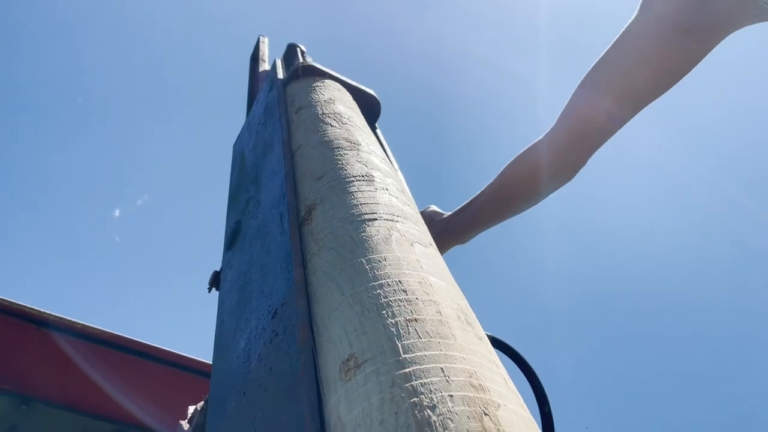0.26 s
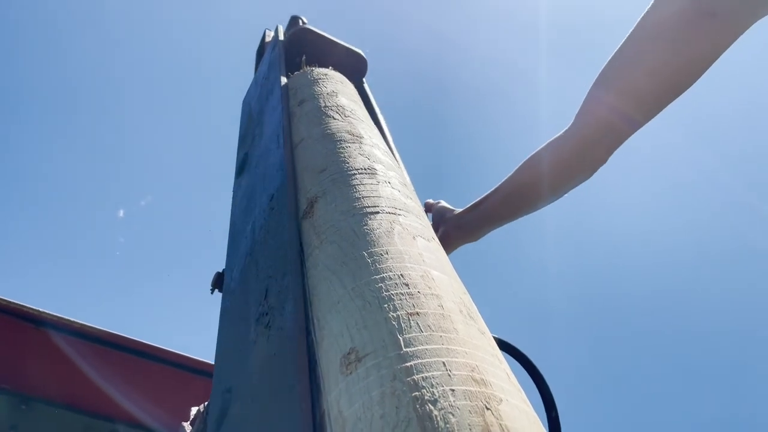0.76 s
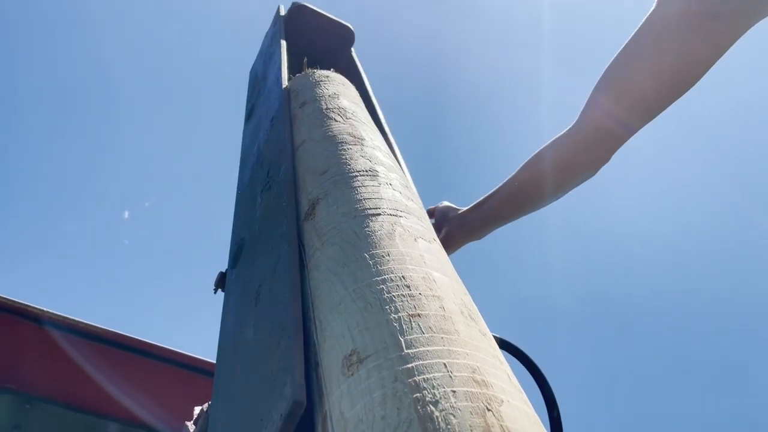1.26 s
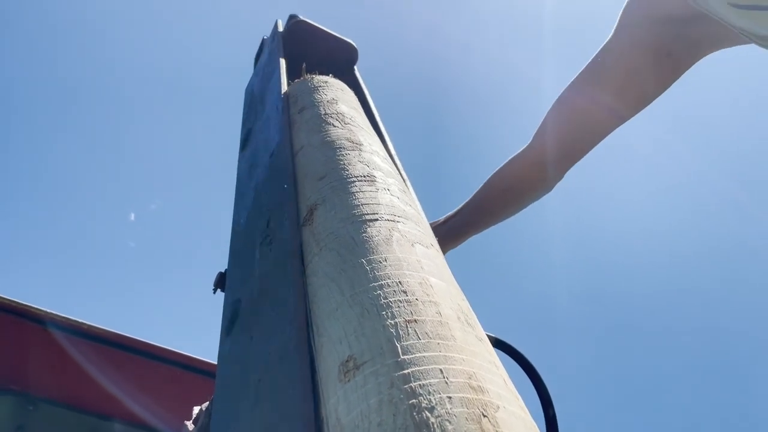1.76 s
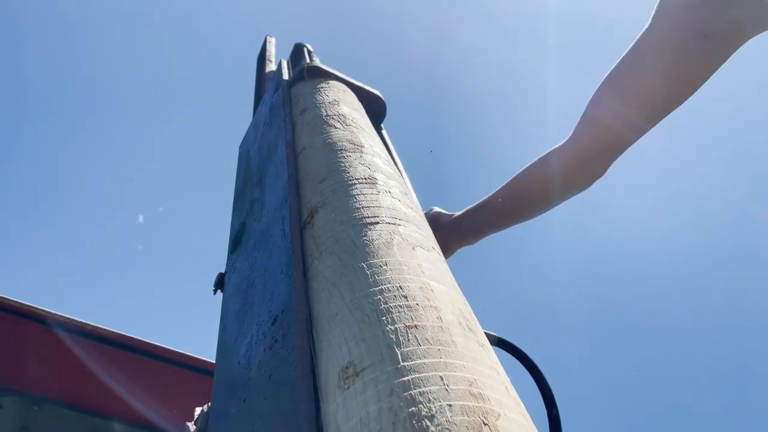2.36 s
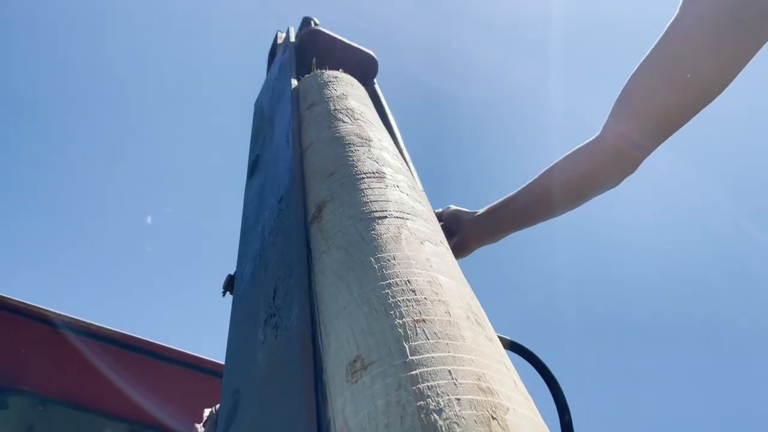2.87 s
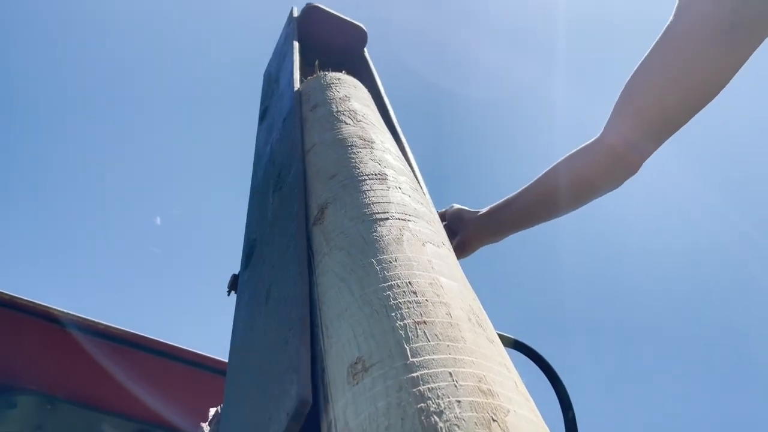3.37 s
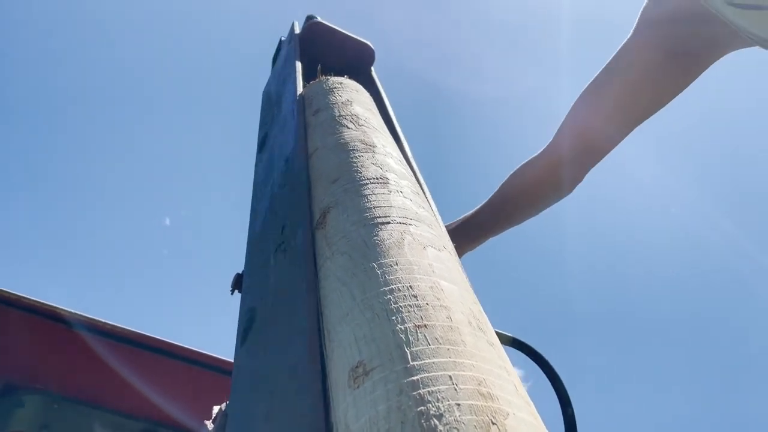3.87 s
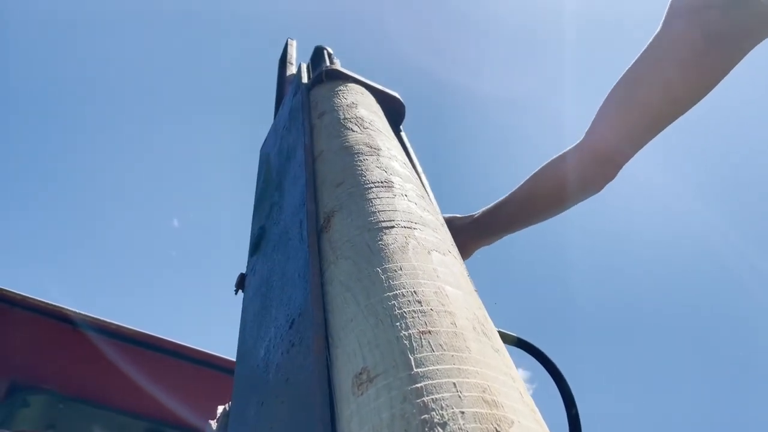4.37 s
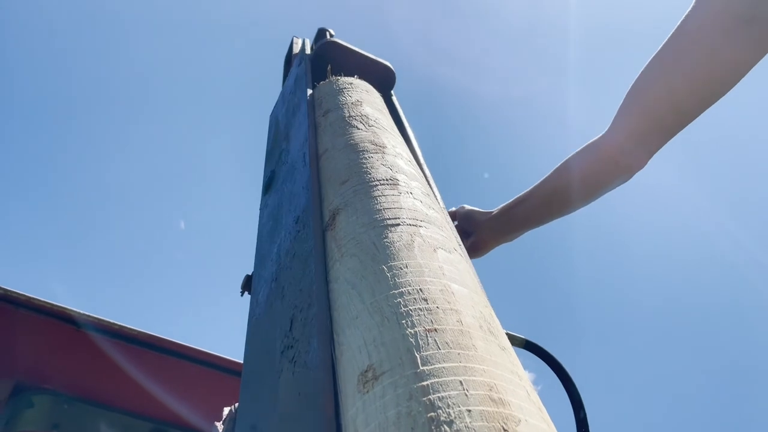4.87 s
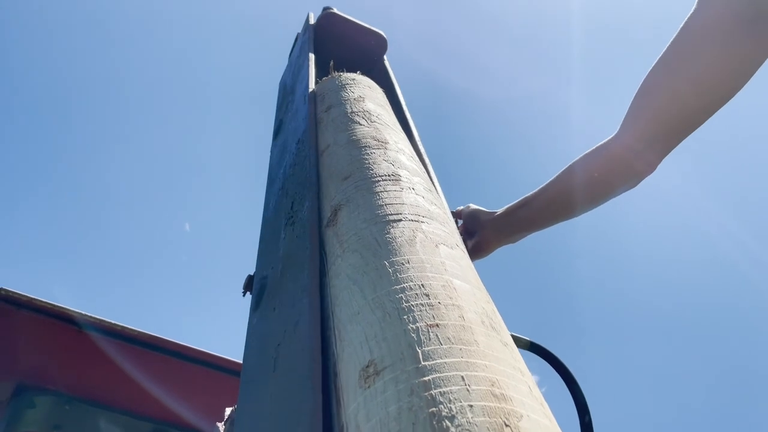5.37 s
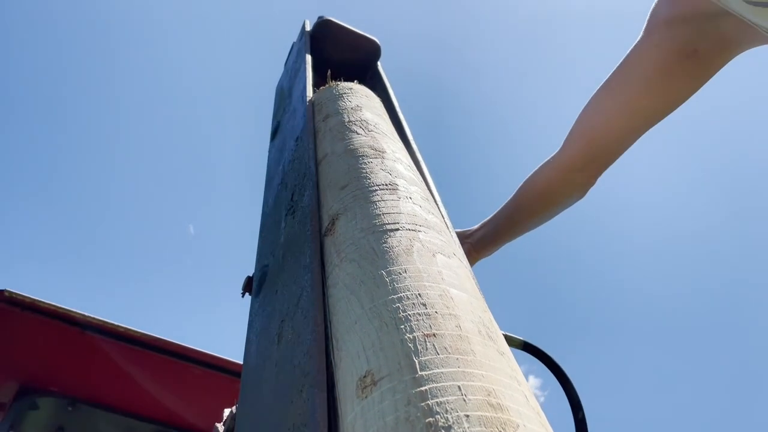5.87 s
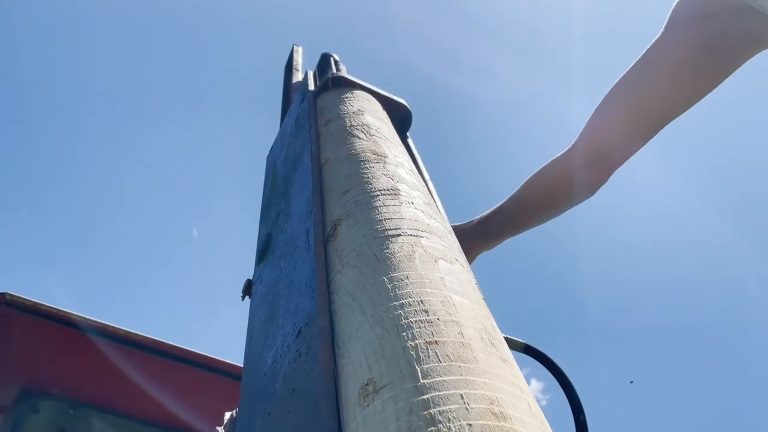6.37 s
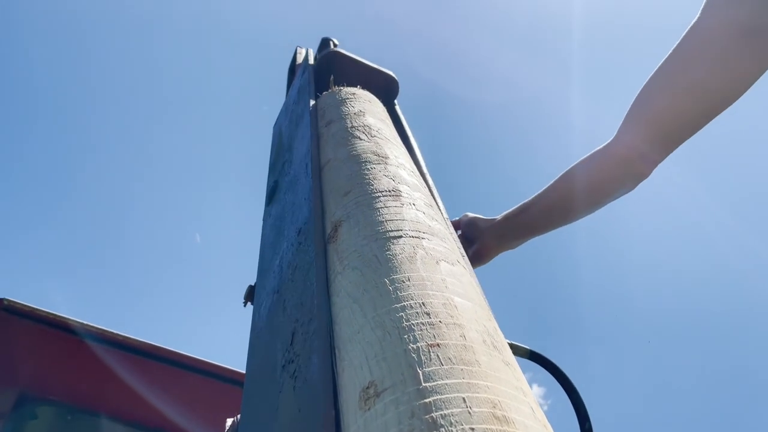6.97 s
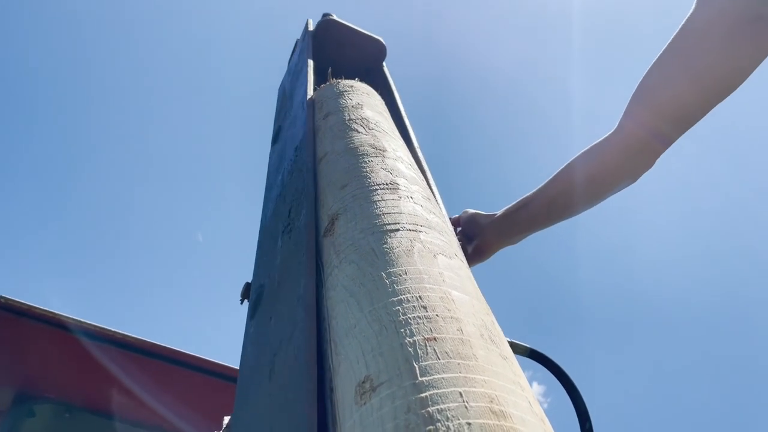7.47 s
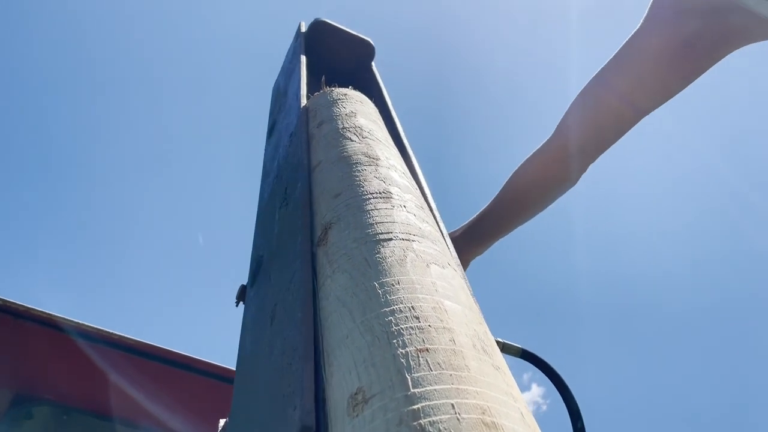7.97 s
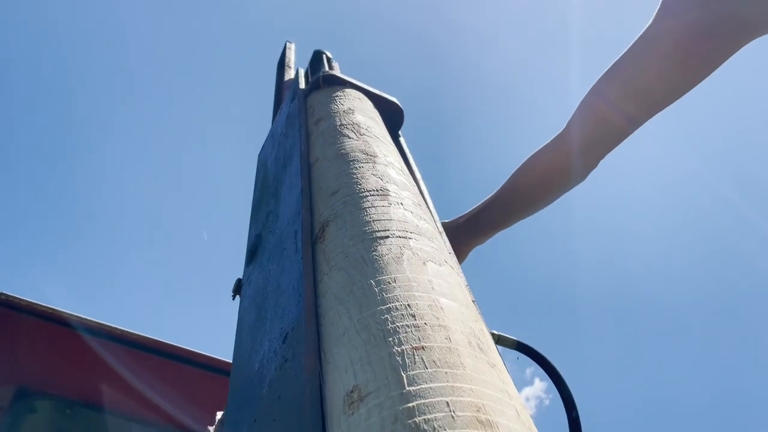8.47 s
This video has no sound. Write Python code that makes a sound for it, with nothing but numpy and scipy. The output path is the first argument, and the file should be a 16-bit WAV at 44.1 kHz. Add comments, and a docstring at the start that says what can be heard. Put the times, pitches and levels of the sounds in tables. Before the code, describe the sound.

A hydraulic post driver on a tractor slams a wooden post about every two seconds, with clanking, scraping steel over a steadily chugging diesel engine.

```python
"""Hydraulic post driver on a tractor

A phone lies at the foot of the post. A steel ram slams down: a falling sweep, a thump, a crack and a long ring.
Loose steel knocks, a plate slaps and a bar taps, each a burst of noise, decaying tones or both.
Shaped noise makes the ram scrape, parts rattle and oil hiss; a valve reversal clunks the frame.
The diesel, tones that follow the crank plus noise, droops as oil lifts the ram.
The phone's gain control ducks after every blow."""
import sys
import numpy as np
from scipy import signal
from scipy.fft import rfft, irfft, next_fast_len
from scipy.io import wavfile
from scipy.ndimage import uniform_filter1d, minimum_filter1d

SR = 44100
rng = np.random.default_rng(int(sys.argv[2]) if len(sys.argv) > 2 else 0)


def dump_mix(stems):
    """Bounce the given channels to the path in sys.argv[1] as a 16-bit WAV at rate SR."""
    frames = np.atleast_2d(stems).T  # one column per channel
    limited = np.clip(frames, -1, 1)  # hard clip at full scale
    pcm = np.round(limited * 32767).astype(np.int16)
    wavfile.write(sys.argv[1], SR, pcm)


N = 384111
LEAD_IN = SR // 4  # samples made before the start and cut off at the end
LONG = N + LEAD_IN
TIME = (np.arange(LONG) - LEAD_IN) / SR
PATHS = 3  # a direct path, then scatter near the left and near the right port

# the ram lands on the post; the first blow falls just before the start:
# t/s, thud level/dB, ring level/dB, loose plate level/dB, bar level/dB,
# then what is added to the usual scraping/dB, rattling/dB and oil hiss/dB
BLOWS = [(-.13, -3, -17, -32, -38, 1.5, 1.5, -0.5), (1.955, -3.0, -16.5, -28.5, -24, 1, 1, -2.3),
         (4.049, -4, -19.5, -34, -29, 2, 0, -1), (6.119, -3.5, -16.5, -32, -31, 1.3, 1, -1),
         (8.277, -4.5, -18, -34, -29, 0, -3, -4)]
# the valve reverses and the frame clunks: t/s, thud level/dB, ring level/dB
CLUNKS = [(0.262, -15, -17), (2.347, -17, -18), (4.481, -10.5, -17), (6.576, -13.5, -17.5),
          (8.688, -14, -19.5)]
# each lift: ram starts to rise t/s, pump lets go at the top t/s, added to the usual oil hiss/dB
LIFTS = [(.6, 1.367, .5), (2.667, 3.521, 1.5), (4.835, 5.601, -1.5), (6.915, 7.716, -1.5)]
# tones of ram, frame and post: f/Hz, level/dB, basic time to fade by 60 dB/s (ring() adapts it)
STEEL = [(288.3, -5.5, 0.26), (382.8, -2.5, 0.34), (468.6, -2.5, 0.89), (496, -3, 0.26), (528.3, 5.5, 0.29),
         (543, 2, 0.33), (602, 2.5, 0.2), (747.6, 0.5, 0.39), (830, -9.5, 0.36), (922, -6.5, 0.6),
         (960, -9.5, 0.86), (1045, -8, 0.5), (1192, -14.5, 0.49), (1272, -13, 0.51), (1364, -10, 0.83),
         (1438, -8, 0.64), (1584, -13, 0.54), (1750, -8, 0.71), (1803, -5.5, 0.35), (2060, -7, 0.37),
         (2530, -5, 0.32), (2972, -11, 0.67), (3710, -9, 0.463), (4000, -18, 0.32), (4400, -23, 0.31),
         (4860, -13, 0.39)]


def undb(db):
    """Turns decibels into a plain multiplier."""
    return 10 ** (np.asarray(db) / 20)


def level(x, db):
    """Sets the average strength (rms) of x to db."""
    return x * undb(db) / np.sqrt(np.mean(x ** 2))


def noise():
    """Plain white noise, different on each path."""
    return rng.standard_normal((PATHS, LONG))


def on_log(table, hz):
    """Reads (Hz, value) points along a logarithmic axis."""
    f, v = np.transpose(table)
    return np.interp(np.log(np.maximum(hz, 1)), np.log(np.maximum(f, 1)), v)


def colour(x, table):
    """Filters x by the curve of (Hz, dB) points and sets its rms to 1."""
    size = next_fast_len(LONG)
    gain = undb(on_log(table, np.fft.rfftfreq(size, 1 / SR)))
    return level(irfft(rfft(x, size) * gain, size)[:, :LONG], 0)


def band(x, hz, width_hz):
    """A resonance: lets through a band around hz."""
    return signal.lfilter(*signal.iirpeak(hz, hz / width_hz, SR), x)


def walk(rate):
    """A smooth random wander: values held 1 / rate s, then smoothed twice; its spread is about 0.74."""
    k = int(SR / rate)
    held = np.repeat(rng.standard_normal(LONG // k + 1), k)
    return uniform_filter1d(uniform_filter1d(held, k), k)[:LONG]


def grit(share, spread_db):
    """Noise in which a share of the samples are clicks of very uneven size."""
    size_db = np.minimum(spread_db * rng.exponential(size=LONG), 4 * spread_db)
    clicks = (rng.random(LONG) < share) * undb(size_db)
    return noise() * (1 + clicks)


def burst(rise_s, fall_s):
    """A short shower of contacts: noise that swells and dies away."""
    t = np.arange(int(.2 * SR)) / SR
    return (1 - np.exp(-t / rise_s)) * np.exp(-t / fall_s) * rng.standard_normal((PATHS, len(t)))


def ring(modes, bright_db, shorten, rise_s, scatter_db, chatter_db=3.5):
    """An object's modes, struck at a different spot each time and heard differently on each path."""
    t = np.arange(int(min(.4, shorten) * SR)) / SR
    hz, db, t60 = np.transpose(modes)
    # bright_db is in dB per octave
    gain = undb(db + bright_db * np.log2(hz / 500) + scatter_db * rng.standard_normal(len(hz)))
    gain = gain * np.exp(2j * np.pi * rng.random((PATHS, len(hz))))
    treble_damping = 0.27  # ring time shrinks as frequency to this power
    fade_s = shorten * t60 * (500 / hz) ** treble_damping
    detuned_hz = hz * (1 + 0.00347 * rng.standard_normal(len(hz)))
    pole = 2j * np.pi * detuned_hz - np.log(1000) / fade_s
    # loose joints chatter, so every mode flickers as it fades
    chatter = SR // 110  # samples between changes of contact
    steps = rng.standard_normal((len(hz), len(t) // chatter + 1))
    held = np.repeat(undb(chatter_db * steps), chatter, axis=1)
    flicker = uniform_filter1d(held, size=chatter)[:, :len(t)]
    tones = gain @ (flicker * np.exp(np.outer(pole, t)))
    return tones.imag * (1 - np.exp(-t / rise_s))


def add(out, s, x):
    """Mixes x into out, starting at s seconds."""
    i = int(s * SR) + LEAD_IN
    out[:, i:i + x.shape[-1]] += x[..., :LONG - i]


def blows():
    """A bending wave arrives treble first and sweeps down, the ground thumps, the steel cracks and rings on."""
    # sweep start Hz, thud length s, brightness dB per octave of the ring, share of free ring time, ring rise s
    blow_tone, clunk_tone = (1750, .0105, 0, 1, .01), (1050, .01, -2.6, 0.24, .007)
    out, t = np.zeros((PATHS, LONG)), np.arange(int(.2 * SR)) / SR
    thump = np.sin(2 * np.pi * 230 * t) * (t / .005) * np.exp(-t / .005)
    thump = thump + .4 * np.sin(2 * np.pi * 100 * t) * (t / .007) * np.exp(-t / .007)
    snap = np.sin(2 * np.pi * 2750 * t) * (t / .0007) * np.exp(-t / .0007)
    hits = [(*row[:3], *blow_tone) for row in BLOWS] + [(*row, *clunk_tone) for row in CLUNKS]
    for s, thud_db, ring_db, start_hz, thud_s, bright_db, shorten, rise_s in hits:
        sweep_hz = 410 + (start_hz - 410) * np.exp(-t / .0008)
        thud_shape = (1 - np.exp(-t * start_hz / .6)) * np.exp(-(t / thud_s) ** 5)
        thud = np.sin(2 * np.pi * np.cumsum(sweep_hz) / SR) * thud_shape
        crack = snap + 1.1 * band(band(burst(.0003, .0025), 2600, 3600), 2600, 3600)
        shudder = band(burst(.004, .035), 1100, 2000)
        sizzle = band(band(burst(.002, 0.036), 3800, 3200), 3800, 3200)
        add(out, s + .001, undb(thud_db) * thud)
        add(out, s, undb(thud_db - 0.3 + 6.5 * bright_db) * thump)
        add(out, s, undb(thud_db - 4 + 8 * bright_db) * crack)
        add(out, s, undb(thud_db - 19.0 + 0.3 * bright_db) * shudder)
        add(out, s, undb(thud_db - 31 + 5 * bright_db) * sizzle)
        add(out, s, undb(ring_db) * ring(STEEL, bright_db, shorten, rise_s, 2.0))
    # the post swells once more after each blow's thud
    rebound_hz, delay_s, swell_s, below_thud_db = 522, .011, .017, -14
    swell = np.sin(2 * np.pi * rebound_hz * t) * (t / swell_s) * np.exp(1 - t / swell_s)
    for s, thud_db, *_ in BLOWS:
        add(out, s + delay_s, undb(thud_db + below_thud_db) * swell)
    return out


def knocks():
    """Short clanks scuff and ring; after each blow a loose plate slaps back and sings, then a bar taps."""
    # loose steel that knocks around every blow: t from the blow/s, level/dB, brightness (0 = neutral)
    shake_pattern = [(-.268, -25.5, 2), (-.21, -32, -5), (.084, -11, -2), (0.101, -21, 9), (.204, -36, 0),
                     (.237, -31, 9.5), (0.364, -43, 15)]
    # other knocks on the frame: t/s, level/dB, brightness (0 = neutral)
    frame_knocks = [(0.607, -22.5, 1), (1.196, -22, -2), (1.24, -33, -6), (2.325, -40, 2),
                    (2.675, -21.5, 2), (3.785, -30, 0), (3.911, -30, 5), (4.414, -36, 1),
                    (4.724, -18, -2.5), (4.758, -13.5, -1), (4.776, -16, 1), (4.796, -18, 4),
                    (5.426, -22.5, 1.5), (5.689, -42.5, 12.5), (6.026, -28, 13), (6.09, -12, 3.5),
                    (6.224, -9, -1), (6.294, -40, 9), (6.489, -38, 14), (6.811, -19, 2), (7.501, -24, -4),
                    (7.571, -22.5, 5), (8.117, -18, -2), (8.196, -14.5, 1), (8.428, -27.5, 13.5),
                    (8.641, -27.5, 14)]
    # tones of the loose plate: f/Hz, level/dB, basic time to fade by 60 dB/s
    plate_modes = [(2510, -6, 0.3), (2750, -4, 0.3), (2950, 1.5, 0.425), (3780, 1, 0.26), (4150, -6.5, 0.3),
                   (4380, 2.5, 0.58), (4410, 1, 0.54), (4500, 3, 0.325), (4680, -4, 0.3), (5050, -5, 0.25),
                   (5240, -5, .2)]
    # tones of a bar that taps once as the ram settles: f/Hz, level/dB, basic time to fade by 60 dB/s
    bar_modes = [(917, 5, .2), (904, -5, .15), (965, -3, 0.15), (1519, -5, .15)]
    slap_delay_s, bar_delay_s = .066, .205
    out = np.zeros((PATHS, LONG))
    shakes = [(blow + s, db, bright_db) for blow, *_ in BLOWS for s, db, bright_db in shake_pattern
              if blow + s > 0]
    for s, db, bright_db in [*shakes, *frame_knocks]:
        scuff = band(band(burst(0.0031, 0.011), 2600, 2800), 2600, 2800)
        bright_scuff = band(band(burst(.001, 0.0082), 10300, 5000), 10300, 5000)
        add(out, s, undb(db - 9) * ring(STEEL, bright_db / 2, .2, .006, 3.5))
        add(out, s, undb(db - 14.5 + 2 * bright_db) * scuff)
        add(out, s, undb(db - 33.5 + 3.03 * bright_db) * bright_scuff)
    for s, _, _, plate_db, bar_db, *_ in BLOWS:
        slap = band(band(burst(0.002, 0.031), 4000, 2800), 4000, 2800)
        add(out, s + slap_delay_s, undb(plate_db) * ring(plate_modes, 2, 0.8, 0.006, 1.5))
        add(out, s + slap_delay_s, undb(plate_db + 12.5) * slap)
        add(out, s + bar_delay_s, undb(bar_db) * ring(bar_modes, 0, 0.6, 0.004, 2.7))
    return out


def strokes():
    """Scraping, rattling and oil levels: each fall, rise and arrival plays its shape at its own time and strength."""
    # every fall and its aftermath: t from the blow/s, scraping/dB, rattling/dB, oil hiss/dB
    fall_shape = [(-.32, -46, -54, -65), (-.285, -41, -60, -66), (-.255, -30.5, -56.5, -59),
                  (-.2, -29, -39, -42), (-.12, -27.5, -43, -45.5), (-.075, -28, -35, -39),
                  (-.03, -22.5, -45.5, -46), (-.005, -24.5, -35, -47), (.005, -20.5, -26.5, -37),
                  (.045, -23.5, -23.5, -34), (.1, -27, -35, -41), (.15, -35, -37, -49),
                  (.175, -32.5, -46, -32), (.21, -38.5, -41, -50), (.25, -44, -44.5, -41.5),
                  (.33, -45, -51, -55.5), (.37, -45.5, -45.5, -44), (.41, -42, -50.5, -51),
                  (.52, -42.5, -52.5, -60)]
    # every lift: t from its start/s, scraping/dB, rattling/dB, oil hiss/dB
    rise_shape = [(-.05, -38.5, -55, -63), (.03, -34.5, -44.5, -47), (.12, -40, -43.5, -48.5),
                  (.2, -37, -43, -48.5), (.4, -38.5, -47, -54.5)]
    # every arrival at the top: t from the pump letting go/s, scraping/dB, rattling/dB, oil hiss/dB
    top_shape = [(-.27, -42, -50.5, -59), (-.13, -36.5, -48, -55), (.05, -50.5, -49, -59.5),
                 (.17, -47.5, -55, -65.5)]
    # the falling ram first scrapes bright, then lower rails join in:
    # t from the blow/s, one blow's share of the tilt/dB per octave
    fall_tilt = [(-.36, -1), (-.27, 10), (-.17, 6), (-.04, -2), (.05, -0.5)]
    starts = [(fall_shape, row[0], row[5:]) for row in BLOWS]
    for rise, top, oil_db in LIFTS:
        starts += [(rise_shape, rise, (0, 0, oil_db)), (top_shape, top, (0, 0, oil_db))]
    rows = [(at + s, *np.add(shape_db, more_db)) for shape, at, more_db in starts for s, *shape_db in shape]
    s, *columns = np.transpose(sorted(rows))
    # the shares of all blows add up; each keeps its end values outside its own points
    tilt = sum(np.interp(TIME - blow, *np.transpose(fall_tilt)) for blow, *_ in BLOWS)
    return *(np.interp(TIME, s, c) for c in columns), tilt


def ram():
    """Steel grinds on steel and shakes the rails, loose parts rattle, oil hisses through the valve."""
    # rail resonances: f/Hz, width/Hz, relative level/dB
    rail_modes = [(501, 37, 9), (593, 77, 5), (840, 70, 5), (1040, 50, 5), (1250, 90, -1), (1450, 80, 0),
                  (1650, 90, 1), (1780, 70, -1), (2020, 60, -6)]
    # colour of the rattle: f/Hz, relative level/dB per Hz
    rattle_curve = [(1500, 9), (2400, -7.5), (3700, 3.5), (4800, -4.5), (5300, -2.5), (5900, -18),
                    (7200, 3.5), (8000, -3), (11000, -65)]
    # loose steel that sings while it rattles: f/Hz, width/Hz, relative level/dB
    jingle_modes = [(1986, 26, -1), (2300, 21, 6.5), (2506, 52, 2), (2714, 83, 8.5), (2950, 140, 3),
                    (3356, 120, 3), (3770, 30, 2.5), (3970, 30, 2.5), (4200, 45, 1), (4410, 27, -6.5),
                    (4600, 38, 0), (4970, 47, 1.5)]
    # colour of the oil hiss: f/Hz, relative level/dB per Hz
    oil_curve = [(4000, -16), (6000, 3.5), (8500, 6.5), (10000, 11.5), (12000, 10.5), (13500, 4.5),
                 (15500, -23)]
    scrape_db, rattle_db, oil_db, tilt_db = strokes()
    grind = grit(.008, 4.5) * undb(2.5 * walk(50))
    rails = 0
    for hz, width, db in rail_modes:
        # the rubbing spot wanders, so each resonance flares on its own
        gain = undb(db + tilt_db * np.log2(hz / 900) + 5 * walk(60))
        rails = rails + gain * band(grind, hz, width) / np.sqrt(width)
    scrape = level(rails, -2.8) + level(band(band(grind, 570, 990), 940, 810), -6.0)
    flutter = 1.8 * walk(28)  # dB, shared by rattle and oil
    shaking = grit(.006, 3.5)
    jingle = sum(undb(db + 5 * walk(30)) * band(shaking, hz, width) / np.sqrt(width)
                 for hz, width, db in jingle_modes)
    rattle = colour(shaking, rattle_curve) + level(jingle, -3)
    rattle = rattle * undb(flutter + 1.8 * walk(60))
    oil = colour(grit(.003, 3.5), oil_curve) * undb(flutter + 3.2 * walk(45))
    return undb(scrape_db) * scrape + undb(rattle_db) * rattle + undb(oil_db + 3) * oil


def crank():
    """Turns a second: a heavy flywheel follows what the governor offers and the pump takes."""
    open_hz, start_hz = 28.547, 26.584  # speed the engine heads for, and speed it begins at
    drag_hz, drag_eases_hz_per_s = 5.027, 1.564
    flywheel_s, governor_s, pump_delay_s = 1.016, .035, .022
    goal = np.full(LONG, open_hz - start_hz)
    # the pump drags from each clunk until the ram is up, less and less; the last lift runs past the end
    for (clunk, *_), free in zip(CLUNKS, [top for _, top, _ in LIFTS] + [np.inf]):
        since = TIME - clunk - pump_delay_s
        pumping = (since > 0) & (TIME < free)
        goal -= pumping * (drag_hz - drag_eases_hz_per_s * since)
    for lag_s in flywheel_s, governor_s:
        keep = np.exp(-1 / (lag_s * SR))
        goal = signal.lfilter([1 - keep], [1, -keep], goal)
    return start_hz + goal


def diesel():
    """Exhaust tones shift their balance with the load; the block roars, and a valve ticks once a turn."""
    # exhaust tones: multiple of the crank rate, level running free/dB, level under load/dB,
    # wavering/dB (the level takes at most steady_db of it; it also shakes the phase)
    exhaust_tones = [(1, -60, -75, 11.5), (2, -24.5, -29.5, 0.5), (2.5, -71, -39, 21), (3, -35.5, -28.5, 3),
                     (4, -33.5, -38.5, 0), (5, -47, -36.5, -0.5), (6, -35.5, -31, 1),
                     (6.5, -50.5, -48.5, 14), (9, -52.5, -54, 11), (10, -59.5, -46, 1.5)]
    # colour of the roar: f/Hz, relative level/dB per Hz
    roar_curve = [(25, -19), (60, -3.5), (150, -6.5), (250, -10), (500, -19), (1000, -33), (1700, -22.5),
                  (2200, -52), (3500, -33.5), (6000, -68), (14000, -58)]
    free_hz, loaded_hz = 27.253, 25.48  # crank rates taken as no load and full load
    roar_db, clatter_db = -35.5, -52.5
    steady_db = 3
    hz = crank()
    turn = np.cumsum(hz) / SR
    turn -= turn[LEAD_IN]
    load = np.clip((free_hz - hz) / (free_hz - loaded_hz), 0, 1)
    tones = 0
    for k, free_db, loaded_db, waver_db in exhaust_tones:
        # the pipe smears each puff, tone by tone (radians)
        lag = .6 * (k - 4) ** 2 - .06 * (k - 4) - 3.15
        tone_db = free_db + (loaded_db - free_db) * load + min(waver_db, steady_db) * walk(14)
        phase = 2 * np.pi * k * turn - lag + 0.13 * waver_db * walk(5.7)
        tones = tones + np.sqrt(2) * undb(tone_db) * np.cos(phase)
    firing = 0.92 + np.exp(-(2 * turn % 1))  # two pulses a turn
    roar = level(colour(firing * noise(), roar_curve), roar_db) * undb(1.5 * walk(6))
    valve = turn + 8.19  # whole numbers fall where it closes
    size = undb(1.5 * rng.standard_normal(int(valve[-1]) + 2))[valve.astype(int)]
    tick = size * (valve % 1) * np.exp(-(valve % 1) / .045) * noise()
    clatter = band(band(tick, 3399, 460), 3399, 460) + 0.81 * band(tick, 3920, 190)
    clatter = clatter + 0.23 * band(tick, 4300, 350) + 0.21 * band(tick, 1640, 360)
    return tones + roar + level(clatter, clatter_db)


def ports(x):
    """Each port hears the direct sound, with its own lead and level, plus its own scatter off ground and machine."""
    # how far the left port leads in the direct sound: f/Hz, lead/radians
    lead_curve = [(0, 0), (55, .09), (130, .24), (157, .75), (260, 1.2), (340, 0.8), (1640, 0.5),
                  (2240, 3.1), (2930, 1.5), (3190, -0.1), (3450, -0.0), (5080, 0.9), (5600, -0.4),
                  (7150, -1.6), (7670, -2.9), (8870, -3.2), (13200, -6.2), (15300, -6.3)]
    # how much louder the left port is: f/Hz, left minus right/dB
    louder_curve = [(60, -0.4), (105, -.4), (130, -3.5), (157, -1.1), (205, -1.4), (260, 3.2), (700, 1.2),
                    (1290, 2.2), (2380, 3.8), (4400, 4.3), (8120, 0), (15000, 0.0)]
    # how much of the power both ports share: f/Hz, share (0 to 1)
    alike_curve = [(60, 1), (200, 1), (500, 0.85), (1000, 0.48), (2500, 0.42), (4500, 0.78), (6000, 0.7),
                   (8500, .95), (11000, 0.8), (14000, 1)]
    size = next_fast_len(LONG)
    hz = np.fft.rfftfreq(size, 1 / SR)
    alike = np.clip(on_log(alike_curve, hz), 0, 1)
    lead = np.interp(hz, *np.transpose(lead_curve))
    direct, *scatter = rfft(x, size)
    side = np.array([[1], [-1]])  # left, right
    shared = np.sqrt(alike) * np.exp(.5j * side * lead) * direct
    heard = shared + np.sqrt(1 - alike) * np.array(scatter)
    return irfft(heard * undb(side * on_log(louder_curve, hz) / 2), size)[:, :LONG]


def duck(x, above_db, slope, hold_s, glide_s):
    """Gain control: loud peaks are held a while and turn the gain down, which glides to its goal."""
    power = uniform_filter1d(np.mean(x ** 2, axis=0), size=220)  # averaged over 5 ms
    loud_db = 10 * np.log10(power + 1e-12)
    hold = int(hold_s * SR)
    held_db = -minimum_filter1d(-loud_db, size=hold, origin=(hold - 1) // 2)
    goal_db = -slope * np.maximum(held_db - above_db, 0)  # slope: dB of cut per dB too loud
    keep = np.exp(-1 / (glide_s * SR))
    for _ in range(2):
        goal_db = signal.lfilter([1 - keep], [1, -keep], goal_db)
    return x * undb(goal_db)


def scene():
    """All sources reach the two ports, the gain control ducks, and the lead-in is cut off."""
    heard = ports(blows() + knocks() + ram() + diesel())
    return duck(heard, above_db=-11.0, slope=1.24, hold_s=0.17, glide_s=0.013)[:, LEAD_IN:]


def record(dry):
    """The phone rounds the loudest peaks and cuts the top."""
    top_hz = 15700
    rounded = .99 * np.tanh(dry / 1.02)
    return signal.sosfilt(signal.ellip(12, .2, 70, top_hz, fs=SR, output="sos"), rounded)


dry = scene()
out = record(dry)
dump_mix(out)
```